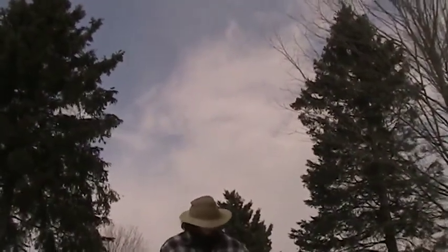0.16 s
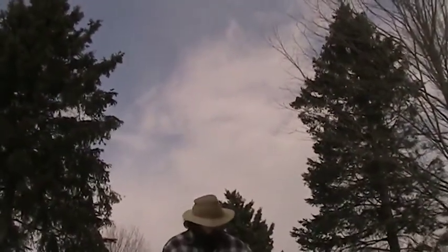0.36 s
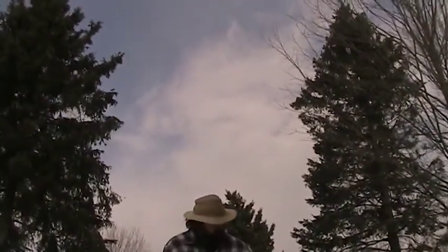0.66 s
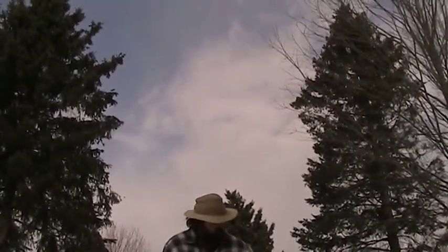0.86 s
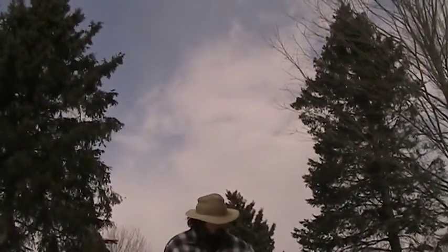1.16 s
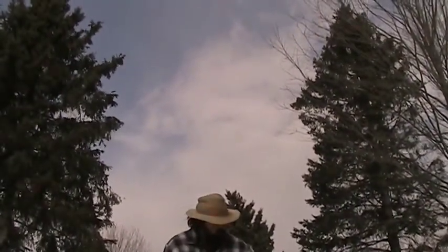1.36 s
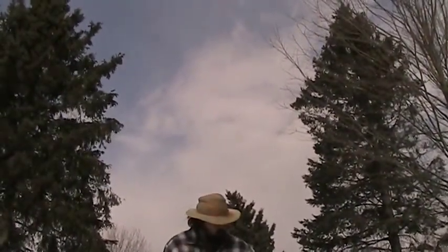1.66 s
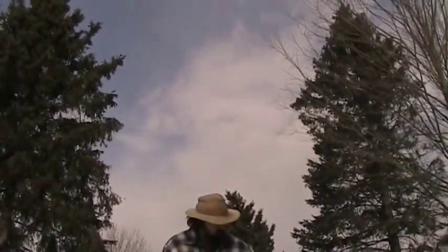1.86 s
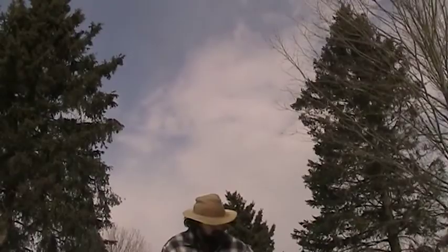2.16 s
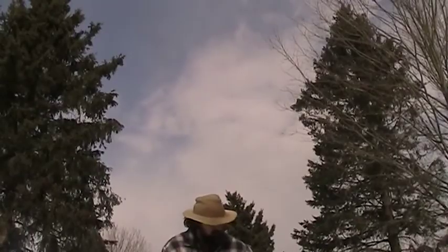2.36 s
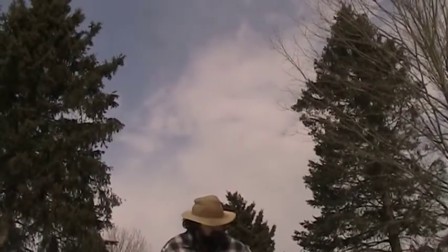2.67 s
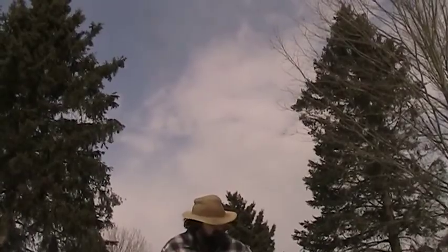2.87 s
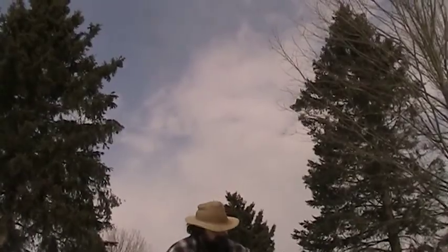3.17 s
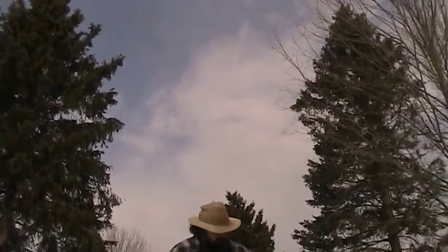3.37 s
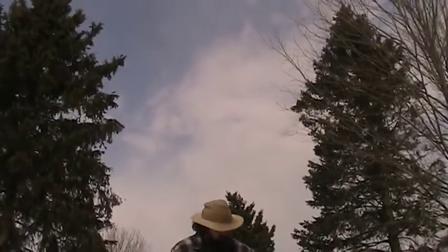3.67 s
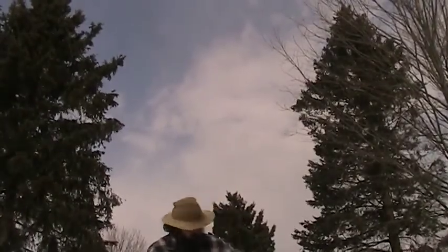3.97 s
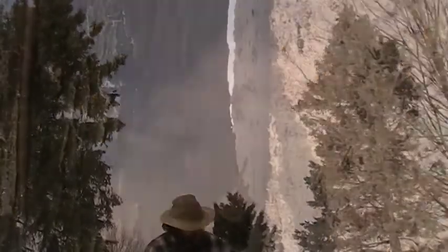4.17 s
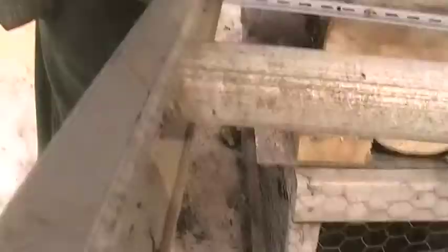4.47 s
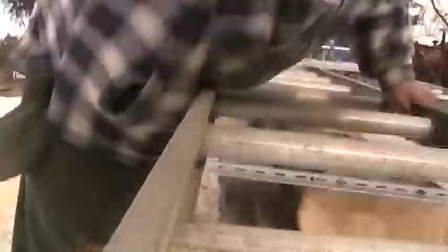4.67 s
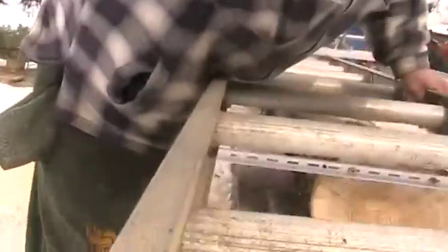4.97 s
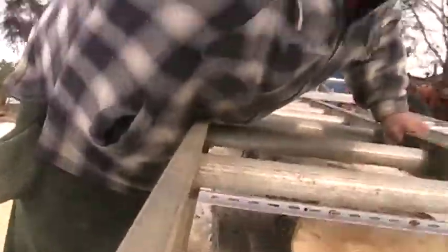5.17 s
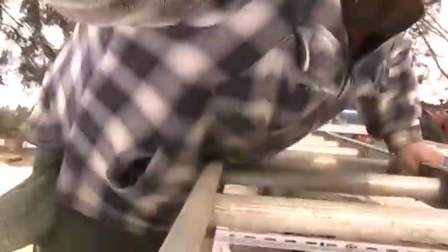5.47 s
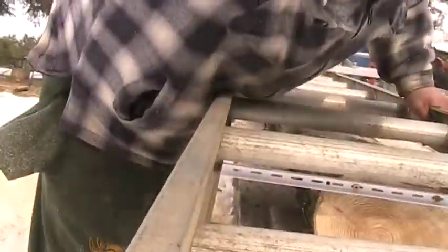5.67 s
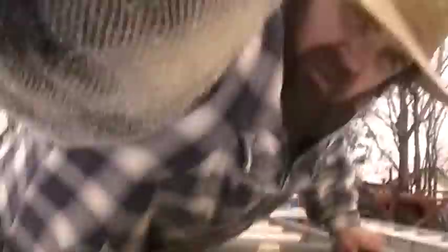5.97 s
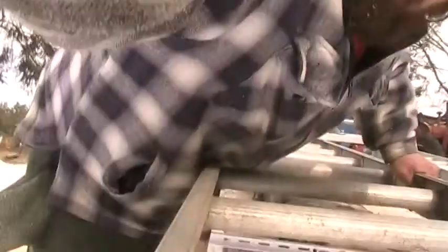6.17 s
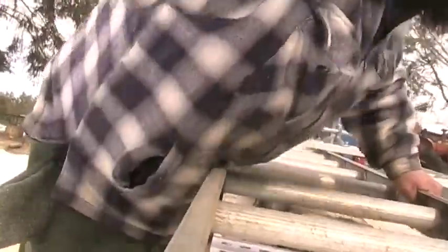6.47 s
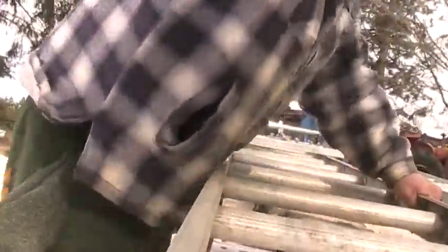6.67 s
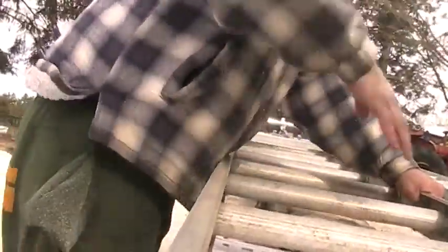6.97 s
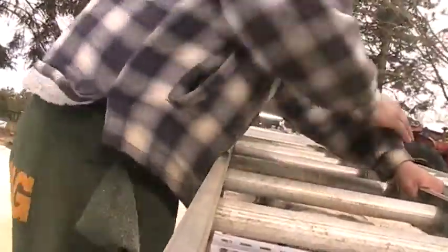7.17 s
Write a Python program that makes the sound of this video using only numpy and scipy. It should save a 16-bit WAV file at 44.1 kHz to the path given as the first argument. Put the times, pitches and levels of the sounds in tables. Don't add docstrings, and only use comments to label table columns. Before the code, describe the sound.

Outdoor stereo sound, dry and close, with the saw leaning left over very faint low air rumble. At 0 s a small two-stroke chainsaw, artificially sped up, surges within 0.2 s into a high, harsh scream. From 0.5 to 0.9 s it sinks to a thicker, honking, rasping buzz as the chain bites, and labours until about 2.4 s, with quick bogs near 1.5, 1.75, 1.95 and 2.25 s. Pitch climbs again to 2.95 s as it breaks through, then falls fast. Throttle blips follow at 3.15, 3.3 (highest), 3.7, 3.85, 4.0, a slight touch at 4.15, and a strong one at 4.3 s, with whining coasts between. The sound fades; two split-second flickers at 4.36 and 4.43 s and a soft bump lead to a nearer view at 4.45 s. There the saw idles until 7.3 s: low, uneven, crackling putter with constant chain and fan rasp, weakening briefly around 6.0, 6.3, 6.5 and 7.0 s.

```python
import sys
import numpy as np
from scipy import signal
from scipy.fft import rfft, irfft, next_fast_len
from scipy.io import wavfile
from scipy.ndimage import uniform_filter1d, map_coordinates

SR = 44100
rng = np.random.default_rng(int(sys.argv[2]) if len(sys.argv) > 2 else 0)


def ratio(d):
    e = np.asarray(d, float) / 20
    return 10 ** e


def store_pcm(level_fs):
    pcm = np.round(np.clip(level_fs, -1, 1) * 32767).astype(np.int16)
    wavfile.write(sys.argv[1], SR, np.atleast_2d(pcm).T)


N = 322812
T = np.arange(N) / SR


def unit(x):
    return x / np.sqrt(np.mean(x ** 2) + 1e-20)


def steady(x):
    return x / np.sqrt(np.abs(uniform_filter1d(x ** 2, size=2200)) + 1e-12)


def along(points, hz):
    f, v = np.transpose(points)
    return np.interp(np.log(hz + 1), np.log(f + 1), v)


def curves(rows):
    s, *columns = np.transpose(sorted(rows))
    return [np.interp(T, s, column) for column in columns]


def wobble(rate):
    knots = rng.standard_normal(int(N * rate / SR) + 4)
    return map_coordinates(knots, [T * rate])


def filtered(x, response):
    m = next_fast_len(N + 8192)
    return irfft(rfft(x, m) * response(np.fft.rfftfreq(m, 1 / SR)), m)[..., :N]


def modes(table, cut_hz):
    def response(f):
        total = 0
        for k, (centre, width, db) in enumerate(table):
            damping = 1j * f * width
            total = total + (-1) ** k * ratio(db) * damping / (centre * centre - f * f + damping)
        return total * f * f / (f * f - cut_hz ** 2 - 1j * np.sqrt(2) * f * cut_hz)
    return response


def dip(centre, width, dip_db):
    return lambda hz: ratio(dip_db * np.exp(-((hz - centre) / width * 2) ** 2))


def pulses(turns, size_db, jitter_s):
    k = np.arange(1, len(size_db) + 1)
    at = (np.interp(k, turns, T) + jitter_s) * SR
    taps = np.floor(at)[:, None] + np.arange(-7, 9)
    kernel = np.sinc(taps - at[:, None]) * np.hanning(18)[1:-1]
    kernel = ratio(size_db)[:, None] * kernel
    return np.bincount(np.clip(taps, 0, N).astype(int).ravel(), kernel.ravel(), N + 1)[:N]


def at_turns(v, turns):
    return np.interp(np.arange(int(turns[-1])), turns, v)


def per_turn_chance(turns):
    return rng.standard_normal(int(turns[-1]))


# (time [s], speed lost [Hz], level [dB])
SNAGS = [
    (1.525, 33, -2),
    (1.742, 18, -1),
    (1.94, 14, -1.5),
    (2.25, 21, 0),
]


def snags():
    s, lost_hz, db = np.transpose(SNAGS)[:, :, None]
    bog_s, recover_s, choke_s = .1, .1, .024
    bog = np.clip(1 - np.maximum((s - T) / bog_s, (T - s) / recover_s), 0, 1)
    choke_db = db * np.exp(-((T - s) / choke_s) ** 2)
    return (lost_hz * bog).sum(0), choke_db.sum(0)


# (time [s], crank speed [turns/s], effort [dB], chain bite [dB], intake load [dB])
CUT = [(.17, 456, -19, -0.5, -1), (.26, 453, -18.5, -2, -1), (.37, 429, -19, -2, -2),
       (.49, 424.4, -19, -1, -1.5), (.64, 403, -18.5, -3, 0), (.76, 368.4, -21, 2, -1.5),
       (.86, 336, -22, 2.5, 1.5), (1.08, 352.8, -22.5, 5, 1.5), (1.17, 348, -22.5, 5, 2),
       (1.39, 356, -22, 4.5, 0), (1.64, 322, -20.5, -3, 0.5), (1.85, 339, -21.5, 1, 0.5),
       (2.1, 329.5, -21, -1.5, -0.5), (2.4, 344.8, -21, 1.5, 0), (2.57, 366.5, -21.5, 2.5, -2),
       (2.729, 406.7, -20.5, 0, -0.5), (2.9, 432, -19.5, -2, -7.5), (2.968, 434, -21, 0, -15)]
# (opening time [s], speed from [turns/s], shutting time [s], top speed [turns/s], effort [dB])
BLIPS = [
    (3.13, 191.8, 3.2, 292, -20),
    (3.25, 265.7, 3.33, 382.5, -19.5),
    (3.612, 184.1, 3.72, 273.8, -19.5),
    (3.805, 209.8, 3.86, 259.9, -19.5),
    (3.975, 181.1, 4.04, 254.7, -19.5),
    (4.129, 195.2, 4.161, 207.6, -20),
    (4.258, 166, 4.322, 238.6, -17),
]
# (time [s], level [dB])
FADE = [(4.08, 2.5), (4.3, -5.5), (4.36, -11.5), (4.45, -20.5)]


def throttle():
    hz, effort_db, bite_db, load_db = curves(CUT)
    lost_hz, choke_db = snags()
    first_s, first_hz = CUT[0][:2]
    exit_s, exit_hz = CUT[-1][:2]
    first_pull = 166 + (first_hz - 166) * (T / first_s) ** .85
    hz = np.where(T < first_s, first_pull, hz - lost_hz)
    opened = (T < exit_s) * 1.
    shut_s, top_hz = exit_s, exit_hz
    last_s, last_hz = 4.45, 171
    for open_s, low_hz, next_shut_s, next_top_hz, _ in BLIPS + [(last_s, last_hz, 9, last_hz, 0)]:
        bend = .78 if shut_s == exit_s else 1.05
        fall = np.clip((T - shut_s) / (open_s - shut_s), 0, 1) ** bend
        rise = np.clip((T - open_s) / (next_shut_s - open_s), 0, 1)
        rise = rise + .61 * (rise ** 2 * (3 - 2 * rise) - rise)
        speed = top_hz * (low_hz / top_hz) ** fall + (next_top_hz - low_hz) * rise
        hz = np.where(T >= shut_s, speed, hz)
        opened[(T >= open_s) & (T < min(next_shut_s, last_s))] = 1
        shut_s, top_hz = next_shut_s, next_top_hz
    cut_effort = [(s, db) for s, _, db, _, _ in CUT]
    blip_effort = [((open_s + close_s) / 2, db) for open_s, _, close_s, _, db in BLIPS]
    effort_db, = curves(cut_effort + blip_effort)
    effort_db = effort_db + choke_db + curves(FADE)[0]
    cutting = T < exit_s
    bite_db = np.where(cutting, bite_db, -1.5)
    bite_db = bite_db + 3.5 * np.exp(-T / .045)
    load_db = np.where(cutting, load_db, -4.5)
    flap_s = .01503
    opened = np.clip(uniform_filter1d(opened, size=max(round(flap_s * SR), 1)), 0, 1)
    return hz, effort_db, bite_db, load_db, opened


# (frequency [Hz], width [Hz], level [dB])
MUFFLER_FACING = [(1170, 230, -6), (1510, 282, 3), (1782, 278, 5), (2020, 205, -1.5)]
MUFFLER_ASIDE = [(977, 87, -7.5), (1805, 346, 2.5), (1960, 375, 3.5), (2180, 227, -2.5)]
# (time [s], share [0-1])
ASIDE = [(0, 1), (.5, 1), (1.45, 0.86), (1.6, 0.63), (2.8, 0.02), (3.05, 0.34), (3.4, 0.16), (3.7, 0.74),
         (4.4, 0.73)]


def exhaust(hz, turns, opened):
    uneven = (250 / at_turns(hz, turns)) ** 2
    shut = at_turns(opened < .5, turns)
    size_db = .9 * uneven * per_turn_chance(turns)
    jitter_s = 1.8e-5 * uneven * (1 + .9 * shut) * per_turn_chance(turns)
    blows = pulses(turns, size_db, jitter_s)
    hiss = np.interp(turns, np.arange(len(shut)), .25 + 1.2 * shut)
    puffs = hiss * np.exp(-4 * (turns % 1)) * rng.standard_normal(N)
    pops = filtered(blows + .055 * puffs, modes([(1700, 2600, 0)], cut_hz=800))
    aside = np.clip(curves(ASIDE)[0], 0, 1)
    facing_sound = steady(filtered(pops, modes(MUFFLER_FACING, cut_hz=940)))
    aside_sound = steady(filtered(pops, modes(MUFFLER_ASIDE, cut_hz=940)))
    level_db = -4.5 * aside - .5 * np.log2(hz / 330)
    return ratio(level_db) * steady((1 - aside) * facing_sound + aside * aside_sound)


# (frequency [Hz], width [Hz], level [dB])
INTAKE = [(410, 310, -9), (665, 181, 1.5), (1070, 150, -11)]
# (crank speed [turns/s], level [dB])
HONK_OPEN = [(170, -9.5), (260, -6.5), (330, -1.5), (400, -5), (430, -8), (455, -16)]
HONK_SHUT = [(170, -13), (215, -18), (250, -23), (300, -23.5), (400, -27)]
# (time [s], share [0-1])
UNLOADING = [(2.38, 0.92), (2.55, 0.3)]


def intake(hz, turns, load_db, opened):
    shut = at_turns(opened < .5, turns)
    size_db = (.3 + 3.5 * shut) * per_turn_chance(turns)
    delay_s = (.7 - .7 * shut) / at_turns(hz, turns) + 1.5e-4 * shut * per_turn_chance(turns)
    gulps = pulses(turns, size_db, delay_s)
    loaded, = curves(UNLOADING)
    full = filtered(gulps, modes(INTAKE, cut_hz=350))
    thin = filtered(gulps, modes(INTAKE[:2], cut_hz=280))
    level_db = opened * (along(HONK_OPEN, hz) + load_db) + (1 - opened) * along(HONK_SHUT, hz)
    return ratio(level_db) * steady(loaded * full + (1 - loaded) * thin)


# (frequency [Hz], width [Hz], level [dB])
CASING = [(2575, 94, 5), (3184, 143, 2), (3590, 330, -2.5), (3905, 160, 1), (4390, 270, -5.5),
          (5250, 79, -11.5)]


def casing(hz, turns, opened):
    blows = pulses(turns + .6, .78 * per_turn_chance(turns), 0)
    shell, broad = modes(CASING, cut_hz=2200), modes([(3600, 3000, 0)], cut_hz=1800)
    scream = filtered(blows, lambda f: shell(f) * broad(f))
    level_db = -11 - 2.5 * (1 - opened) + 7 * np.log2(hz / 330)
    return ratio(level_db) * steady(scream)


# (crank speed [turns/s], level [dB])
SPROCKET = [(180, -12), (205, -8.5), (225, -3.5), (270, -6), (330, -18), (455, -30)]
# (time [s], level [dB])
FREE_WHINE = [(.15, -10), (3, -11), (3.12, 6), (3.17, -6), (3.4, -10), (3.5, -4.5), (4.05, -1), (4.15, -12)]


def sprocket(hz, turns):
    level_db = along(SPROCKET, hz) + curves(FREE_WHINE)[0] + 1.5 * wobble(9)
    return ratio(level_db) * np.sqrt(2) * np.sin(2 * np.pi * 8 * turns + .3 * wobble(40))


# (crank speed [turns/s], level [dB])
BREATH = [(190, -30.5), (260, -22.5), (325, -18.5), (350, -25), (405, -12), (435, -12), (455, -9.5)]


def crankcase(hz, turns, opened):
    level_db = along(BREATH, hz) - 11 * (1 - opened)
    return ratio(level_db) * np.sqrt(2) * np.sin(2 * np.pi * turns)


def cutters(turns, bite_db):
    out_of_wood = (T > CUT[-1][0]) | (T < CUT[0][0])
    level_db = -22 + 3.2 * bite_db - 30 * out_of_wood
    return ratio(level_db) * np.sqrt(2) * np.sin(18 * np.pi * turns)


# (frequency [Hz], width [Hz], level [dB])
HOUSING = [(3030, 23, -5), (4070, 37, -23), (5020, 135, 0.5), (6140, 35, 9.5), (7660, 62, 0),
           (8620, 120, -3.5), (9800, 230, -1.5), (11160, 64, 2)]
# (frequency [Hz], coherence [0-1])
ALIKE = [(60, 0.24), (500, 0.92), (2000, 1), (4000, 0.81), (12000, 0.71)]


def rasp(spectrum, turns, beat, patchy_db, ring_db):
    z = signal.stft(rng.standard_normal((2, N)), nperseg=256)[2]
    field = uniform_filter1d(rng.standard_normal(z.shape[1:]), size=4, axis=0)
    field = uniform_filter1d(field, size=6, axis=1)
    pair = signal.istft(z * ratio(patchy_db * unit(field)), nperseg=256)[1][:, :N]
    pair = pair * (1 + beat * np.cos(2 * np.pi * turns))
    pair = pair * ratio(.12 * wobble(8.2) + .86 * wobble(60))
    housing = modes(HOUSING, cut_hz=900)

    def mid_side(hz):
        angle = np.arccos(np.clip(along(ALIKE, hz), -1, 1)) / 2
        colour = ratio(along(spectrum, hz)) * (1 + ratio(ring_db) * np.abs(housing(hz)))
        return colour * [np.cos(angle), np.sin(angle)]

    mid, side = filtered(pair, mid_side)
    return unit(np.array([mid + side, mid - side]))


# (frequency [Hz], spectral level [dB])
RASP_FAR = [(100, -45), (400, -27), (800, -31), (1600, -4), (2400, -5), (3900, -3), (5200, -0.5),
            (8200, -6), (9700, -3.5), (16000, -9)]


def revving():
    hz, effort_db, bite_db, load_db, opened = throttle()
    turns = .9 + np.cumsum(hz) / SR
    tones = intake(hz, turns, load_db, opened) + exhaust(hz, turns, opened)
    tones = tones + casing(hz, turns, opened) + sprocket(hz, turns)
    tones = ratio(effort_db) * tones
    loaded, = curves(UNLOADING)
    tones = loaded * tones + (1 - loaded) * filtered(tones, dip(1102, 79, -13))
    tones = filtered(tones, dip(1264, 150, -5))
    tones = tones + ratio(effort_db) * (crankcase(hz, turns, opened) + cutters(turns, bite_db))
    noise = rasp(RASP_FAR, turns, beat=.073, patchy_db=1.0, ring_db=-9)
    return tones + ratio(effort_db + bite_db - 3.5) * noise


# (frequency [Hz], spectral level [dB])
RUMBLE = [(12, -30), (20, 0), (60, -5), (200, -1), (260, 1), (440, -120)]
# (time [s], level [dB])
THUMPS = [
    (.002, -16),
    (4.263, -41),
    (4.438, -20),
]


def rumble():
    noise = rng.standard_normal((3, N))
    shared, left, right = filtered(noise, lambda hz: ratio(along(RUMBLE, hz)))
    bumps = -sum(ratio(db) * np.exp(-((T - s) / .00025) ** 2) for s, db in THUMPS)
    air = unit(np.array([shared + .9 * left, shared + .9 * right]))
    return bumps + ratio(-64 + 2.5 * wobble(6)) * air


# (time [s], crank speed [turns/s], exhaust level [dB])
IDLE = [(4.46, 149.8, -21.5), (4.63, 151.4, -22), (5.05, 143, -21.5), (5.4, 148.7, -22), (5.9, 151.5, -22),
        (6.25, 149.5, -22), (6.43, 145.4, -22), (6.65, 150.5, -22), (7.3, 151.2, -22.5)]
# (time [s], duration [s])
MISFIRES = [
    (5.99, .035),
    (6.29, .12),
    (6.485, .04),
    (6.975, .04),
]
# (frequency [Hz], width [Hz], level [dB])
MUFFLER_NEAR = [(425, 118, -4.5), (888, 290, -1), (1185, 590, -2), (1588, 165, 3.5), (1998, 154, -4.5),
                (2930, 320, -10.5)]
# (frequency [Hz], spectral level [dB])
RASP_NEAR = [(100, -35), (300, -18), (800, -6.5), (1600, 0), (2400, -2.5), (3000, -5.5), (3800, -6.5),
             (6200, -5.5), (9000, -9.5), (12500, -12), (16000, -18.5)]


def idling():
    hz, exhaust_db = curves(IDLE)
    rasp_db = exhaust_db - 2 + .3 * (hz - hz[T > IDLE[0][0]].mean())
    near_s = FLICKER[-1][0]
    hz = hz * (1 + .005 * wobble(10) * (T > near_s))
    turns = np.cumsum(hz) / SR
    turns += np.ceil(turns[-1]) - turns[-1] - np.interp(near_s, T, turns - turns[-1]) % 1
    chance = rng.standard_normal((int(turns[-1]), 3))
    count = len(chance)
    gaps = 3 + (chance[:, 2] > 1.3).astype(int) - (chance[:, 2] < -1.3)
    gap = np.repeat(gaps, gaps)[:count]
    since = np.arange(count) - np.repeat(np.cumsum(gaps) - gaps, gaps)[:count]
    jolt_s = 2.1e-4 * ratio(2.5 * np.repeat(chance[:, 0], gaps)[:count])
    turn_s = np.interp(np.arange(count) + 1, turns, T)
    missed = [(turn_s > s) & (turn_s < s + length) for s, length in MISFIRES]
    firing = ~np.any(missed, axis=0)
    late_s = np.cumsum((.55 + .45 * firing) * jolt_s * (since - (gap - 1) / 2)) + 2e-5 * chance[:, 1]
    late_s = late_s - late_s[round(np.interp(near_s, T, turns)) - 1]
    burn = firing & (since == gap - 1)
    pops = pulses(turns, 1.6 * burn + .37 * chance[:, 0], late_s)
    muffler, broad = modes(MUFFLER_NEAR, cut_hz=300), modes([(1500, 1800, 0)], cut_hz=200)
    ground_echo = dip(783, 36, -11)
    exhaust_sound = filtered(pops, lambda f: muffler(f) * broad(f) * ground_echo(f))
    body = modes([(156, 49, -5.5), (230, 110, -2.5), (400, 176, 5.0)], cut_hz=150)
    thud = filtered(pulses(turns, 16 * burn, late_s), body)
    tones = unit(exhaust_sound) + ratio(-23.5) * unit(thud)
    noise = rasp(RASP_NEAR, turns + .095, beat=.21, patchy_db=.9, ring_db=-1.5)
    return -ratio(exhaust_db + 3.5) * tones + ratio(rasp_db) * noise


# (start time [s], end time [s], lag [ms], level [dB])
FLICKER = [
    (4.36, 4.372, .3, -3),
    (4.4265, 4.4383, 1.3, -3.5),
    (4.4493, 8, 0, 0),
]


def scene():
    mix, near = revving(), idling()
    for start, end, lag_ms, db in FLICKER:
        shifted = np.roll(near, round(lag_ms * SR / 1000), axis=1)
        mix = np.where((T >= start) & (T < end), ratio(db) * shifted, mix)
    return mix + rumble()


# (frequency [Hz], level difference [dB])
LEAN = [(60, 1), (180, 6.5), (550, 5), (1650, 4.5), (4970, 2), (15000, 0.5)]


def microphones(dry):
    body = dip(2423, 234, -5)

    def response(hz):
        sides = ratio(np.outer([.5, -.5], along(LEAN, hz)))
        return body(hz) * (hz < 16000) * sides

    return filtered(dry, response)


def band_limit(x):
    return signal.sosfilt(signal.butter(12, 17070, fs=SR, output="sos"), x)


def record(dry):
    finished = microphones(dry)
    return band_limit(finished)


dry = scene()
out = record(dry)
store_pcm(out)
```